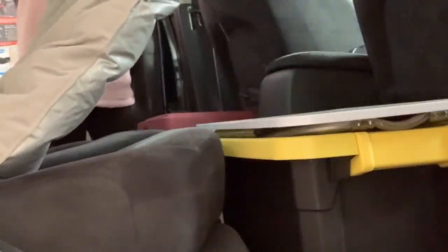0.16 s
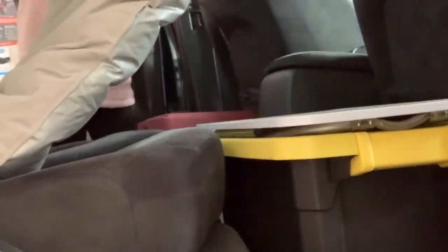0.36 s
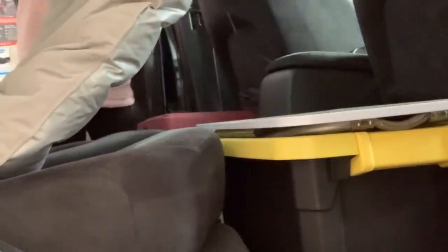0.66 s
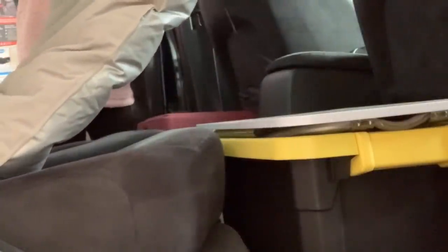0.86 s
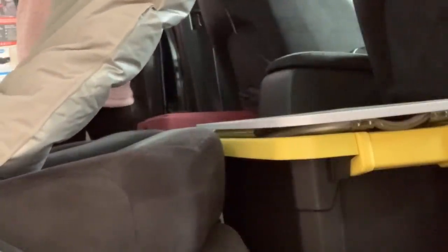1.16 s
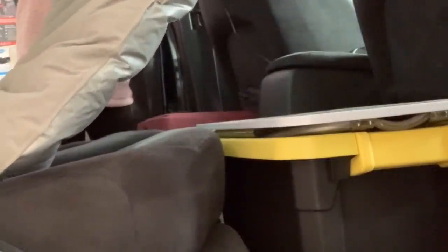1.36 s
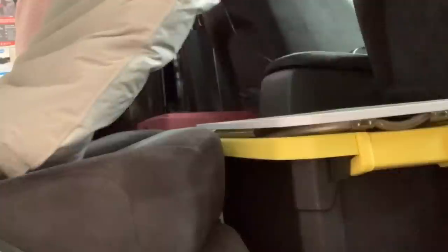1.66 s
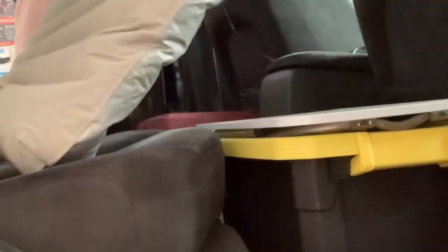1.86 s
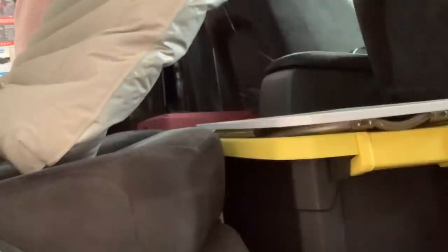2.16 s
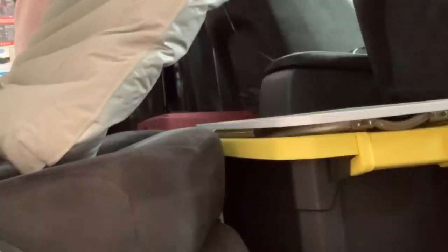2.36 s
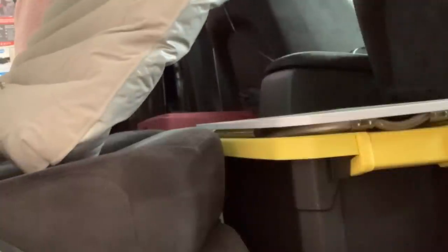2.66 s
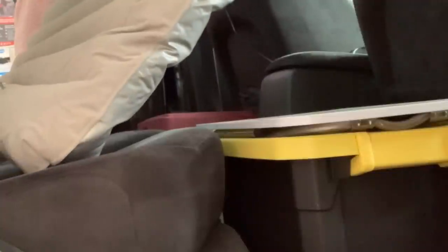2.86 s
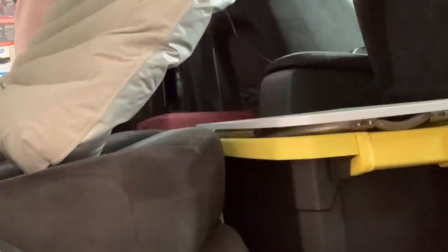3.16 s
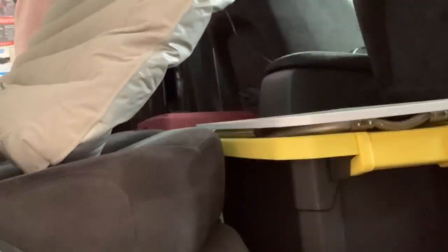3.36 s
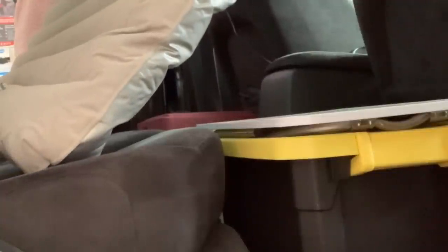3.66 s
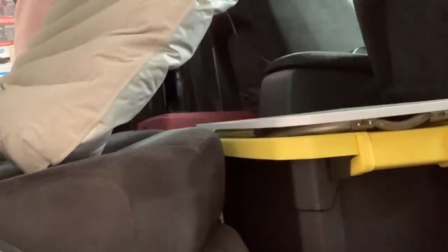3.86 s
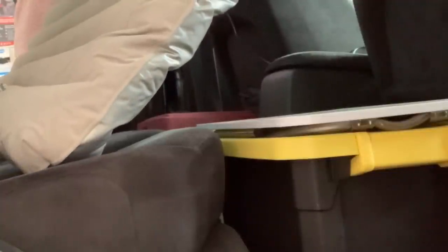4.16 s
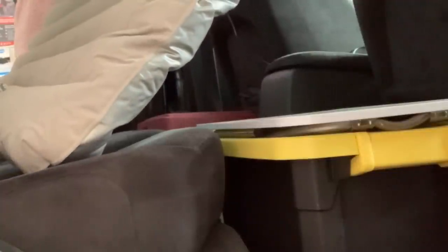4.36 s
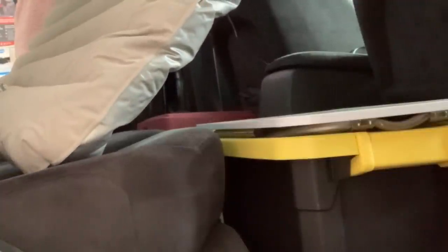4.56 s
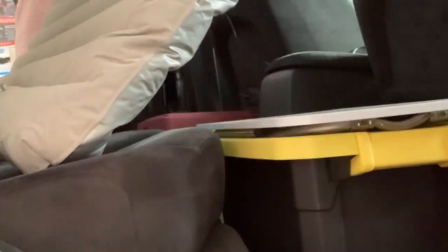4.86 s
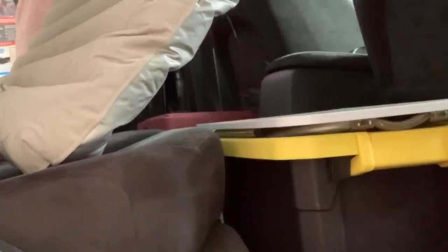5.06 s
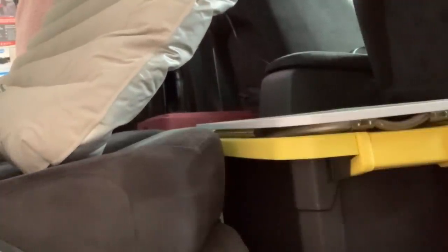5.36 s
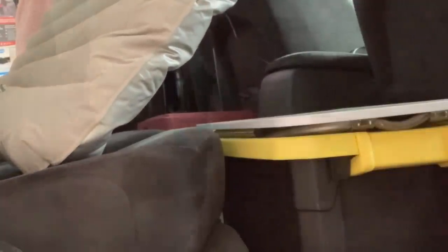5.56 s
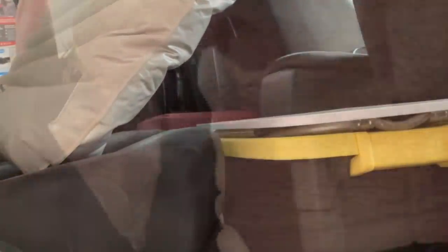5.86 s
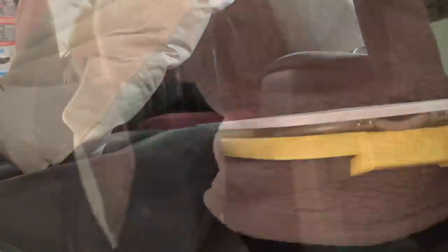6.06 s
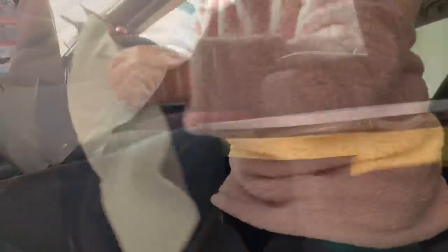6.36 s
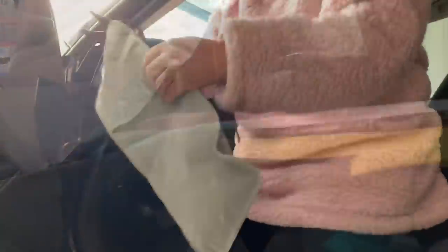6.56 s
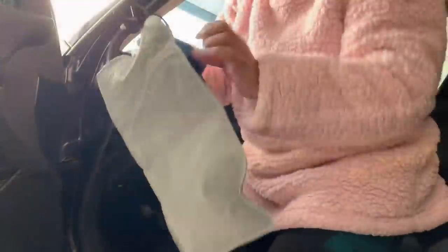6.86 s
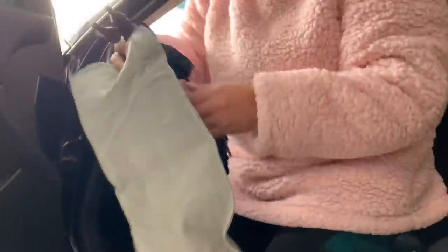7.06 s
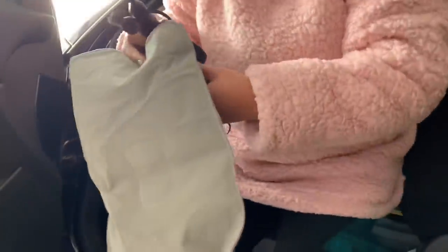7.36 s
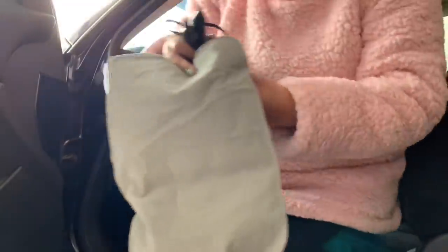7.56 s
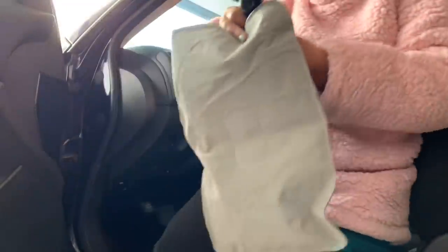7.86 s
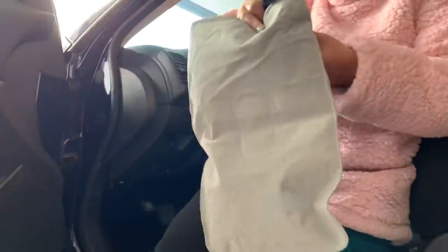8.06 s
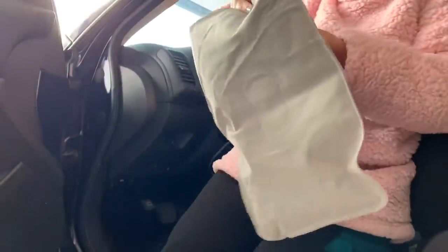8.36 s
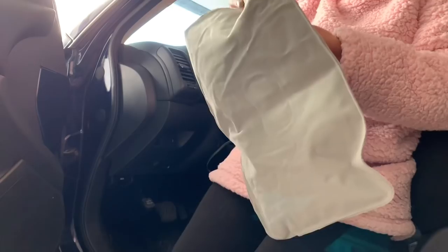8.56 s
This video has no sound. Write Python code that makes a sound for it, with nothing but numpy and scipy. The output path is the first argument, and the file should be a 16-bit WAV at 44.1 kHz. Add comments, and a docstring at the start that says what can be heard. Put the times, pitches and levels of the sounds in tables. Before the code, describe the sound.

A motor's buzzing whine and dense air rush fill a cramped car cabin, close to a small stereo microphone. The start is leakier and more whistling, then the tone settles, with fluctuating hiss and deep engine boom. Faint cloth rustle slips in around six seconds. The pump vanishes at about seven, exposing low engine rumble, quick cloth rubs, soft knocks on trim and tiny snaps.

```python
"""An electric blower fills an air mattress in a small idling car: rotor tones on a shaft, filtered noise for air.
A nozzle leak dies away, hose whistles ring, and engine orders throb below.
A quiet moment fades in underneath, then the pumping is cut short: slower idle, cushion fabric rubbed and
bumped (swelling noise grips, ringing trim modes, short snaps), soft cabin air.
Two microphone ports a few centimetres apart hear most sources with phase shifts that vary with pitch."""
import sys
import numpy as np
from scipy import signal
from scipy.fft import rfft, irfft, next_fast_len
from scipy.io import wavfile
from scipy.ndimage import map_coordinates

SR = 44100
rng = np.random.default_rng(int(sys.argv[2]) if len(sys.argv) > 2 else 0)


def pcm_store(signal):
    """Save signal as 16-bit PCM."""
    levels = np.round(np.clip(np.atleast_2d(signal), -1, 1) * 32767)
    wavfile.write(sys.argv[1], SR, levels.astype(np.int16).T)


N = 383669
TIME = np.arange(N) / SR
SIZE = next_fast_len(N)
HZ = np.maximum(np.arange(SIZE // 2 + 1) * SR / SIZE, 1)


def amp(db):
    """Decibels to gain."""
    return 10 ** (np.asarray(db) / 20)


def rms_one(x):
    """Scale to rms 1."""
    return x / np.sqrt(np.mean(x ** 2) + 1e-20)


def in_time(rows):
    """Columns of a curve, one value a sample."""
    s, *columns = np.transpose(rows)
    return [np.interp(TIME, s, c) for c in columns]


def in_pitch(rows):
    """Columns of a spectrum, one value a bin, interpolated over log frequency."""
    hz, *columns = np.transpose(rows)
    return [np.interp(np.log(HZ), np.log(hz), c) for c in columns]


def drift(rate_hz):
    """Slow random curve of rms 1: white knots through a two-pole low-pass."""
    knots_per_s, settle = 200, 400
    knots = rng.standard_normal(int(N / SR * knots_per_s) + settle + 2)
    r = np.exp(-2 * np.pi * rate_hz / knots_per_s)
    slow = signal.lfilter([1], [1, -2 * r, r * r], knots)[settle:]
    return np.interp(TIME * knots_per_s, np.arange(len(slow)), rms_one(slow))


def bell(hz, width_hz):
    """Resonance gain over frequency: top 1, width at half gain."""
    return 1 / (1 + (2 * (HZ - hz) / width_hz) ** 2)


def bells(rows):
    """Sum of resonance gains with levels in dB."""
    return sum(amp(db) * bell(hz, width_hz) for hz, width_hz, db in rows)


def at_ports(x, ports, other=None):
    """Right port: the shifted sound, mixed with unrelated sound where reflections blur it."""
    alike, lead_rad, balance_db = in_pitch(ports)
    alike = 1 if other is None else np.clip(alike, 0, 1)
    left = rfft(x, SIZE)
    right = alike * left * np.exp(1j * lead_rad)
    if other is not None:
        right += np.sqrt(1 - alike ** 2) * rfft(other, SIZE)
    pair = [left * amp(balance_db / 2), right * amp(-balance_db / 2)]
    return irfft(pair, SIZE)[:, :N]


def noise(gain, ports, grain_db=0):
    """Coloured stereo noise of rms 1; random per-sample gains make it grainy."""
    grains = amp(grain_db * np.minimum(rng.exponential(1, SIZE), 5))
    white = rng.standard_normal((2, SIZE)) * grains
    pair = irfft(rfft(white) * gain, SIZE)
    return rms_one(at_ports(pair[0], ports, pair[1]))


# cabin reflections colour the air unevenly
PATCH_DB, PATCH_HZ, PATCH_S = 2.5, 140, .3


def patchy(x, patch_db=PATCH_DB, patch_hz=PATCH_HZ, patch_s=PATCH_S):
    """Gains that wander smoothly over pitch and time; rms 1."""
    hz, s, z = signal.stft(x, SR, nperseg=1024)
    grid = rng.standard_normal((int(SR / 2 / patch_hz) + 2, int(N / SR / patch_s) + 2))
    where = np.meshgrid(hz / patch_hz, s / patch_s, indexing="ij")
    gain = amp(patch_db * map_coordinates(grid, where, order=1))
    return rms_one(signal.istft(z * gain, SR)[1][:, :N])


def shaft(hz, jitter, rate_hz):
    """Angle of a shaft whose speed wavers."""
    return 2 * np.pi * np.cumsum(hz * (1 + jitter * drift(rate_hz))) / SR


def orders(rows, turn, flutter_db, flutter_hz):
    """Sines on multiples of the shaft angle, each fluttering on its own."""
    out = 0
    for k, db in rows:
        gain = amp(db + flutter_db * drift(flutter_hz))
        out = out + gain * np.sin(k * turn + rng.uniform(0, 2 * np.pi))
    return np.sqrt(2) * out


def tone(rows, jitter, flutter_db):
    """One sine that follows a pitch and level curve."""
    hz, db = in_time(rows)
    return orders([(1, db)], shaft(hz, jitter, 12), flutter_db, flutter_hz=12)


# blower at the ports: pitch_hz, noise_likeness_0_to_1, right_lead_rad, left_minus_right_db
BLOWER_PORTS = [(40, 1, 0, 0), (75, .99, .12, 0), (110, .4, 1, 1), (150, .7, .5, 1), (195, .65, .8, .5),
                (260, .5, .8, -1), (360, .75, .15, -2.8), (420, .65, 1, -1.5), (600, .3, .9, -1.5),
                (760, .65, 1.6, -1.5), (930, .2, .2, -.5), (1090, .45, .6, -2.8), (1400, .45, -.4, -.5),
                (1800, .4, 2.3, -.3), (2200, .5, 1.4, -2.5), (2600, .4, 2.2, -.3), (3500, .45, 1.9, -1.2),
                (4000, .4, 2.8, 0), (4300, .4, 2.6, 1.5), (5400, .3, 3.4, -1.5), (6600, .6, 4.1, -1.2),
                (7500, .8, 3.7, 0), (7900, .998, 3.14, 0), (10000, .998, 3.14, 0), (10600, .72, 2.5, -.3),
                (11500, .5, 1.4, 0), (12400, .8, .4, 0), (13000, .998, 0, 0)]
# how loose the nozzle sits: time_s, looseness_db
LOOSENESS = [(0, 10), (.7, 1), (1.3, -2), (1.6, -6.5), (5.4, -2.5), (5.8, -1), (6.97, -2.5)]
# high hiss and its tone: time_s, lower_band_db, upper_band_db, order_24_db
HISS = [(0, -61, -61, -72), (1.2, -59, -63, -67), (2.2, -57, -68, -64), (3.3, -55.5, -75, -61),
        (4.3, -59, -65, -65), (5, -56.5, -64, -67), (6, -59, -62, -69), (6.97, -56.5, -59, -70)]
# rotor speed: time_s, turns_per_s
ROTOR_SPEED = [(0, 362.5), (.45, 361.9), (.9, 363.2), (1.3, 363.5), (6.97, 363.6)]


def blower():
    """One shaft angle times both the rotor tones and the pulse in the rush; nozzle looseness steers levels."""
    loose_db, = in_time(LOOSENESS)
    lower_db, upper_db, order_24_db = in_time(HISS)
    turn = shaft(in_time(ROTOR_SPEED)[0], jitter=.0006, rate_hz=12)
    tones = at_ports(rotor(turn, loose_db, order_24_db), BLOWER_PORTS) + high_tones(turn)
    air = air_rush(turn) + nozzle_leak() + hiss(lower_db, upper_db)
    return tones + air + bag_drone(loose_db)


# main tones as the mattress shifts around the blower: time_s, order_1_db, order_3_db, order_6_db
MAIN_TONES = [(0, -59, -78, -70), (.55, -56.5, -56.5, -48.5), (.72, -51, -55.5, -54.5),
              (1.15, -49.5, -55.5, -55), (1.6, -47, -51.5, -50.5), (2.3, -47, -51, -51.5),
              (3.75, -47.5, -50, -54.5), (4.64, -50.5, -50, -53.5), (5.28, -46.5, -49.5, -54.5),
              (5.6, -56.5, -50.5, -63), (5.88, -46, -49, -57.5), (6.3, -51.5, -50.5, -50),
              (6.97, -51, -49.5, -54)]
# steady orders: multiple, level_db_rms
STEADY_ROTOR = [(4, -66), (5, -62), (18, -68), (36, -72)]
# orders raised by a loose nozzle: multiple, level_db_rms_at_0_db_looseness
LOOSE_ROTOR = [(5, -61), (13, -65), (14, -66), (17, -72)]
# orders raised by a tight nozzle: multiple, level_db_rms_at_0_db_looseness
TIGHT_ROTOR = [(7, -66), (8, -69)]
FAINT_ORDERS = range(15, 39)


def rotor(turn, loose_db, order_24_db):
    """Rotor tones at multiples of the shaft speed."""
    first_db, third_db, sixth_db = in_time(MAIN_TONES)
    main = orders([(1, first_db), (3, third_db), (6, sixth_db)], turn, flutter_db=1.6, flutter_hz=14)
    whine = orders(STEADY_ROTOR + [(24, order_24_db)], turn, flutter_db=2.2, flutter_hz=14)
    faint = orders([(k, -80) for k in FAINT_ORDERS], turn, flutter_db=4.5, flutter_hz=1.2)
    loose = amp(loose_db) * orders(LOOSE_ROTOR, turn, flutter_db=3, flutter_hz=5)
    tight = amp(-loose_db) * orders(TIGHT_ROTOR, turn, flutter_db=2.2, flutter_hz=14)
    return main + whine + faint + loose + tight


# high tones by shifting paths: time_s, orders_9_to_12_in_step_db (4 columns),
# orders_9_to_12_opposed_db (4 columns), left_minus_right_db
HIGH_TONES = [(0, -64, -72, -60, -58, -63, -75, -60, -54, -3),
              (.4, -66, -66, -63, -60, -65, -75, -66, -57, -3),
              (.6, -63, -61, -59, -54.5, -63, -72, -70, -66, 0),
              (1.3, -61, -66, -68, -59, -61, -66, -67, -66, -4),
              (1.75, -70, -67, -73, -64, -66, -64, -66, -55, 1),
              (2.7, -67, -65, -74, -66, -65, -63, -64, -54, 2),
              (4.1, -68, -72, -73, -65, -64, -70, -62, -61, 1),
              (5.7, -71, -71, -74, -62, -65, -72, -59, -59, 0),
              (6.97, -63, -71, -70, -57, -64, -75, -56, -63, 0)]
HIGH_ORDERS = (9, 10, 11, 12)


def high_tones(turn):
    """Each order has a part in step and a part opposed at the ports, a quarter cycle apart."""
    *high_db, balance_db = in_time(HIGH_TONES)
    left_right = np.array([[1], [-1]])
    out = 0
    for k, step_db, opposed_db in zip(HIGH_ORDERS, *np.split(np.array(high_db), 2)):
        angle = k * turn + rng.uniform(0, 2 * np.pi)
        step = amp(step_db) * np.sin(angle)
        opposed = amp(opposed_db) * np.cos(angle) * left_right
        out = out + amp(1.5 * drift(12)) * (step - opposed)
    return np.sqrt(2) * out * amp(balance_db / 2 * left_right)


# air rush spectrum: pitch_hz, relative_density_db
RUSH = [(25, -54), (60, 0.5), (130, -4.5), (250, -9.5), (420, -3), (1050, -5), (1200, -15.5), (1700, -12.5),
        (3000, -13.5), (5500, -16.5), (7000, -16), (9000, -32.5), (11500, -22), (14000, -27),
        (15700, -32.5)]
# cabin and hose resonances in the rush: pitch_hz, width_hz, boost_db
HOSE = [(300, 49, 8), (888, 27, -8.5), (1318, 185, 9.5), (1846, 39, 11), (2157, 350, 7.5), (2792, 46, 9.5),
        (4890, 260, 5.5), (12660, 870, 5.5)]
RUSH_DB, RUSH_PULSE_DB = -44, 0.94


def air_rush(turn):
    """Turbulent noise coloured by hose and cabin, pulsing once a turn."""
    colour_db = in_pitch(RUSH)[0]
    colour_db = colour_db + sum(db * bell(hz, width_hz) for hz, width_hz, db in HOSE)
    level_db = RUSH_DB + .5 * drift(12.0) + RUSH_PULSE_DB * np.sin(turn)
    return amp(level_db) * patchy(noise(amp(colour_db), BLOWER_PORTS))


# leak at the ports: pitch_hz, noise_likeness_0_to_1, right_lead_rad, left_minus_right_db
LEAK_PORTS = [(3000, 0.57, 0.59, .1), (6000, 0.41, 1.3, .1)]
LEAK_START_DB, LEAK_LAST_DB, LEAK_SEALS_S = -49, -62, 0.78


def nozzle_leak():
    """Band of air noise that dies away as the nozzle seats."""
    fall_db = (LEAK_START_DB - LEAK_LAST_DB) * np.exp(-TIME / LEAK_SEALS_S)
    level_db = LEAK_LAST_DB + fall_db + 1.5 * drift(3.9)
    return amp(level_db) * patchy(noise(bell(3920, 2450) ** 2, LEAK_PORTS))


def hiss(lower_db, upper_db):
    """Two bright noise bands, the lower from the valve, fluttering together."""
    lower = amp(lower_db) * noise(bell(8500, 2600) ** 2, BLOWER_PORTS)
    upper = amp(upper_db) * noise(bell(10400, 2200) ** 2, BLOWER_PORTS)
    return amp(drift(8)) * (lower + upper)


# bag resonances: pitch_hz, width_hz, relative_level_db
BAG = [(671, 29, 3.5), (710, 21, 0), (790, 34, 1)]
BAG_DB, BAG_FOLLOWS = -57, 1   # level at 0 dB looseness; dB per dB of tightness


def bag_drone(loose_db):
    """Noise in the bag's resonances, louder the tighter the nozzle."""
    return amp(BAG_DB - BAG_FOLLOWS * loose_db) * noise(bells(BAG), BLOWER_PORTS)


# breathy hose whistles, never below lasting_db: pitch_hz, width_hz, start_db, fall_db_per_s, lasting_db
WHISTLES = [(926, 40, -57.5, 2.5, -73), (1877, 22, -70, 3, -64.5), (4980, 160, -62, 13, -86.5),
            (1015, 17, -70, 3, -65)]
# wobbling whistle at the start: time_s, pitch_hz, level_db
WOBBLE = [(0, 910, -56), (.055, 935, -47), (.12, 930, -63), (.18, 885, -56), (.235, 928, -49),
          (.3, 953, -62), (.4, 937, -75)]


def whistles():
    """Air edges sing into narrow resonances, some fading to a lasting level, others steady throughout."""
    white = rfft(rng.standard_normal(SIZE))
    out = tone(WOBBLE, jitter=0.00393, flutter_db=0.5)
    for hz, width_hz, start_db, fall_db_per_s, last_db in WHISTLES:
        level_db = np.maximum(start_db - fall_db_per_s * TIME, last_db)
        out = out + amp(level_db) * rms_one(irfft(white * bell(hz, width_hz), SIZE)[:N])
    return at_ports(out, BLOWER_PORTS)


# idle while pumping: multiple, relative_level_db
FAST_IDLE = [(1, -20.5), (2, 0.33), (3, -19), (4, -21), (5, -19.5), (5.5, -28), (6, -26.5), (7.25, -24.5),
             (8.25, -27), (9, -23), (16, -25.5), (18, -22)]
FAST_IDLE_HZ, FAST_IDLE_DB = 37.05, -38.5
# idle in the quiet moment: multiple, relative_level_db
SLOW_IDLE = [(1, -21.5), (2, 0.9), (3, -8), (4, 0.5), (6, -20), (7, -10), (8, -15.5), (9, -14.5)]
SLOW_IDLE_HZ, SLOW_IDLE_DB = 31.03, -54
BODY_SMEAR = .4   # the body spreads each throb: rad per order squared


def idle(rows, hz, level_db, ports):
    """Engine orders boom through the body, phases tied to one shaft so that they throb."""
    turn = shaft(hz, jitter=0.00298, rate_hz=3.1)
    boom = 0
    for k, db in rows:
        boom = boom + amp(db + 0.34 * drift(8.6)) * np.cos(k * turn + BODY_SMEAR * k * k)
    return amp(level_db) * at_ports(np.sqrt(2) * boom, ports)


# quiet moment at the ports: pitch_hz, noise_likeness_0_to_1, right_lead_rad, left_minus_right_db
CABIN_PORTS = [(60, .99, 0, 0), (130, .95, 0, 0), (290, .72, .1, .2), (700, .12, .4, 0), (5000, .25, -3, 0),
               (6400, .6, 0, 0), (7500, .65, 1.7, 0), (8200, .998, 3.14, 0), (8800, .998, 3.14, 0),
               (9500, .7, 4.3, 0), (10400, .998, 6.28, 0), (11600, .998, 6.28, 0), (12000, .6, 7.4, 0),
               (12800, .998, 9.42, 0), (14100, .99, 9.42, 0), (14700, .4, 11.5, 0), (15200, .99, 12.57, 0)]
# grips and rubs: peak_s, fade_20_db_s (at least .01 is used), bright_rustle_db, dull_rub_db
GRIPS = [(5.97, -0.8, -48, -72), (6.1, 0.15, -52, -70), (6.6, 0.24, -52, -70), (6.8, -0.03, -55, -68),
         (6.97, 0.1, -65, -75), (7.255, 0.45, -66, -75.5), (7.705, 0.06, -53.5, -58), (7.78, 2, -73, -79.5),
         (7.915, 0.13, -71, -52.5), (8.025, 0.15, -52, -56.5), (8.058, 0.2, -61.5, -59),
         (8.14, 0.23, -65, -68), (8.32, 0, -76.5, -80), (8.49, 0.3, -74, -73.5), (8.574, 0.3, -69, -72)]
# rustle spectrum: pitch_hz, relative_density_db
BRIGHT = [(1500, -26.5), (3500, 3.5), (6000, -1.5), (8000, 2.5), (11000, -0.5), (13500, -3.5), (15700, -10)]
# rub spectrum: pitch_hz, relative_density_db
DULL = [(250, -6), (400, 1), (700, -2), (1200, -4.5), (2200, -3.5), (4500, -19), (8000, -49)]
CREASE_DB, CREASE_HZ, CREASE_S = 4.5, 350, .03   # each crease has a pitch of its own
CRUMPLE_DB = 2   # creases give way in clumps
RISE_SHARE = 0.38   # rise time / fade time


def fabric():
    """Coated cloth rustles and rubs under the hands: each grip swells fast and fades."""
    s, fade_s, bright_db, dull_db = np.transpose(GRIPS)[:, :, None]
    fade_s = np.maximum(fade_s, .01)
    shape_db = -20 * np.maximum((TIME - s) / fade_s, (s - TIME) / (RISE_SHARE * fade_s))
    rustle = noise(amp(in_pitch(BRIGHT)[0]), CABIN_PORTS, grain_db=3.0)
    rustle = patchy(rustle, CREASE_DB, CREASE_HZ, CREASE_S) * amp(CRUMPLE_DB * drift(37.0))
    rub = noise(amp(in_pitch(DULL)[0]), CABIN_PORTS, grain_db=3.0) * amp(CRUMPLE_DB * drift(40.0))
    bright_gain = amp(bright_db + shape_db).sum(axis=0)
    dull_gain = amp(dull_db + shape_db).sum(axis=0)
    return bright_gain * rustle + dull_gain * rub


# soft bumps on the trim: start_s, level_db
KNOCKS = [(7.05, -56), (7.062, -48), (7.907, -57), (7.916, -53), (7.929, -51.5), (7.981, -55), (8.021, -54),
          (8.033, -53), (8.048, -53), (8.053, -57), (8.66, -59)]
# trim modes: pitch_hz, relative_level_db, t60_s
TRIM = [(328, -10, 0.069), (427, 3, 0.13), (568, -10, 0.17), (714, -16, 0.071), (302, 3.5, 0.021),
        (2170, -9, .03)]
# seam snaps: start_s, relative_level_db
SNAPS = [(8.4891, -51), (8.5689, -52)]


def bumps():
    """Knocks ring the trim's modes; seam snaps are short bright bursts."""
    ring = np.zeros(N)
    for s, db in KNOCKS:
        age_s = np.maximum(TIME - s, 0)
        for hz, mode_db, t60_s in TRIM:
            ring += amp(db + mode_db - 60 * age_s / t60_s) * np.sin(2 * np.pi * hz * age_s)
    burst = np.zeros(N)
    for s, db in SNAPS:
        age_s = np.maximum(TIME - s, 0)
        burst += amp(db - 60 * age_s / 0.032) * (TIME >= s)
    snaps = .4 * burst * noise(amp(in_pitch(BRIGHT)[0]), CABIN_PORTS)
    return at_ports(ring, CABIN_PORTS) + snaps


# cabin air and engine noise: pitch_hz, relative_density_db
CABIN = [(25, -28), (60, 6), (140, -2), (280, -2.5), (340, -7), (900, -12.5), (1060, -10.5), (1350, -16),
         (1850, -18), (2300, -18.5), (2800, -17.5), (4500, -25.5), (6500, -34.5), (15700, -42)]
CABIN_DB = -55.5
# faint breathy tones: pitch_hz, width_hz, level_db
VENTS = [(1140, 40, -73), (1560, 70, -73), (1820, 70, -72), (1950, 40, -77)]
# faint drifting hum: time_s, pitch_hz, level_db
HUM = [(7.12, 1050, -70), (7.38, 1040, -70), (7.48, 1029, -73), (8.14, 1028, -71), (8.25, 1068, -73),
       (8.42, 1032, -72), (8.7, 1003, -70)]


def db_sum(rows):
    """Total power of the last column, in dB."""
    return 10 * np.log10(np.sum(amp(np.array(rows)[:, -1]) ** 2))


def cabin():
    """Soft air noise, narrow noise bands as breathy tones, and a sine hum alike in both ports."""
    air = amp(CABIN_DB + .5 * drift(9.6)) * noise(amp(in_pitch(CABIN)[0]), CABIN_PORTS)
    # dividing by root width keeps each band's power at its level
    vent_gain = sum(amp(db) * bell(hz, width_hz) / np.sqrt(width_hz) for hz, width_hz, db in VENTS)
    vents = amp(db_sum(VENTS)) * noise(vent_gain, CABIN_PORTS)
    return air + vents + tone(HUM, jitter=.005, flutter_db=2.5)


CUT_S, CUT_FADE_S = 6.976, 0.0027
QUIET_START_S, QUIET_FADE_S = 5.42, 0.1


def scene():
    """The pumping moment ends at a cut; the quiet moment has faded in before it."""
    pumping = blower() + whistles() + idle(FAST_IDLE, FAST_IDLE_HZ, FAST_IDLE_DB, BLOWER_PORTS)
    quiet = fabric() + bumps() + idle(SLOW_IDLE, SLOW_IDLE_HZ, SLOW_IDLE_DB, CABIN_PORTS) + cabin()
    fade_out = np.clip((CUT_S - TIME) / CUT_FADE_S, 0, 1)
    fade_in = np.clip((TIME - QUIET_START_S) / QUIET_FADE_S, 0, 1)
    return pumping * fade_out + quiet * fade_in


CUTOFF_HZ = 15700


def record(dry):
    """A steep elliptic low-pass cuts the top."""
    low_pass = signal.ellip(14, .5, 70, CUTOFF_HZ, fs=SR, output="sos")
    return signal.sosfilt(low_pass, dry)


dry = scene()
out = record(dry)
pcm_store(out)
```